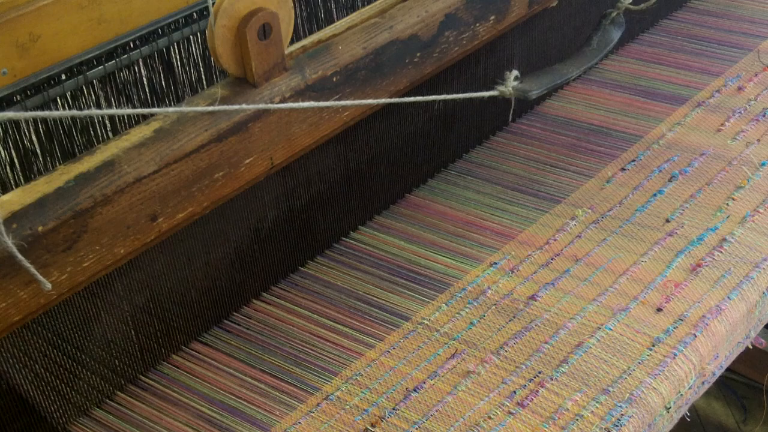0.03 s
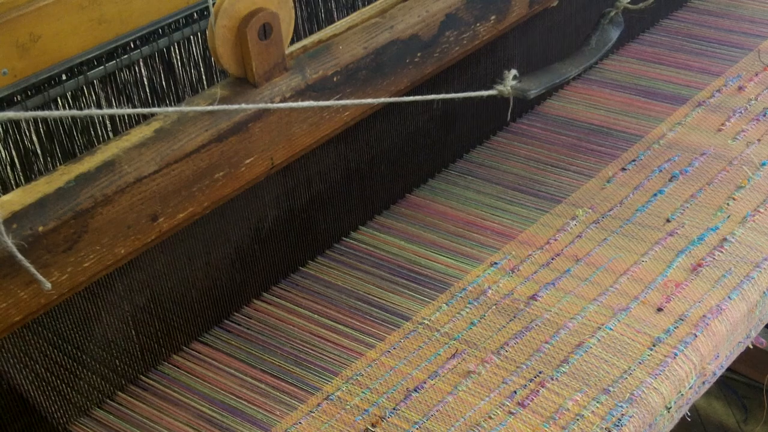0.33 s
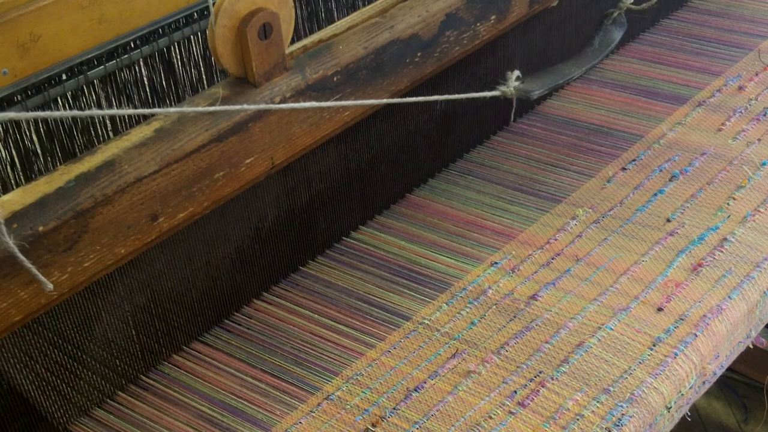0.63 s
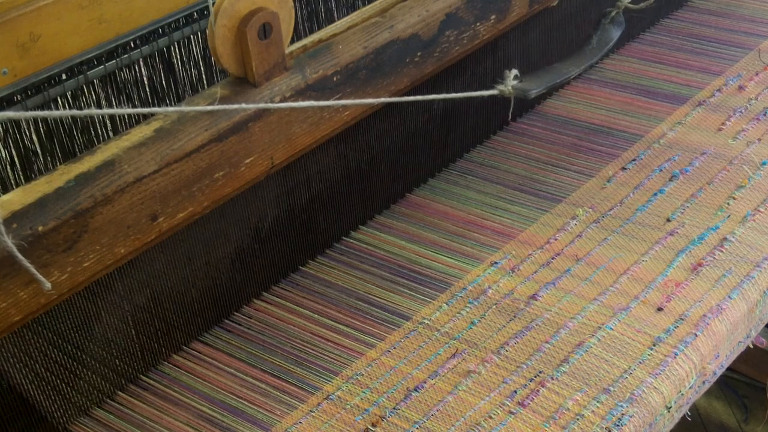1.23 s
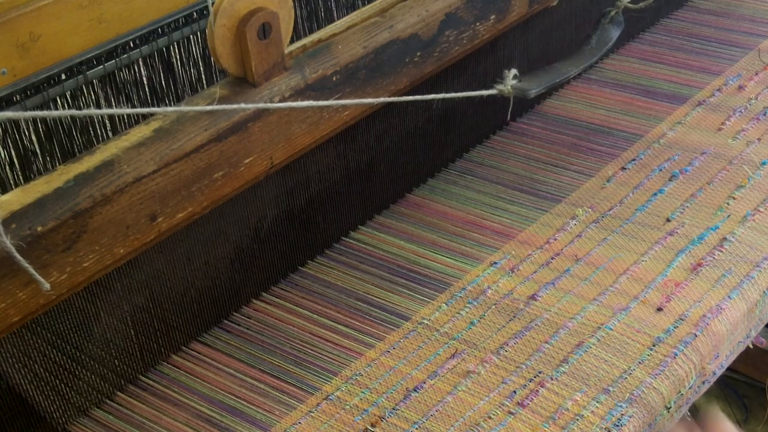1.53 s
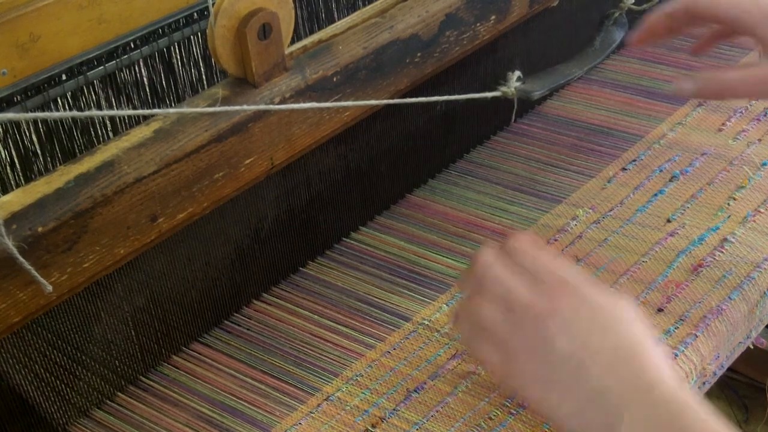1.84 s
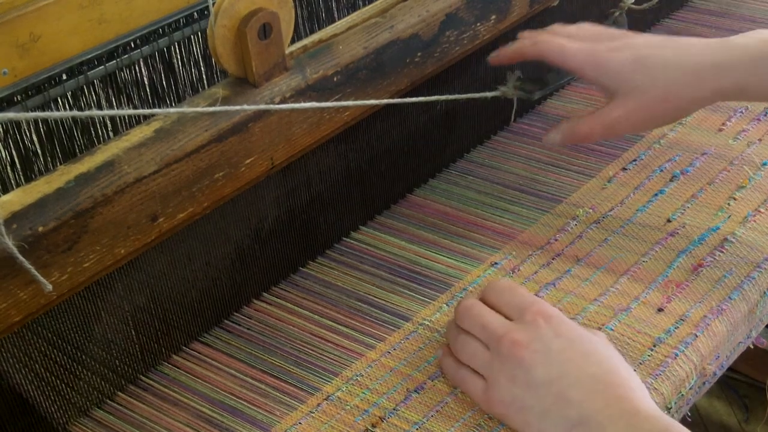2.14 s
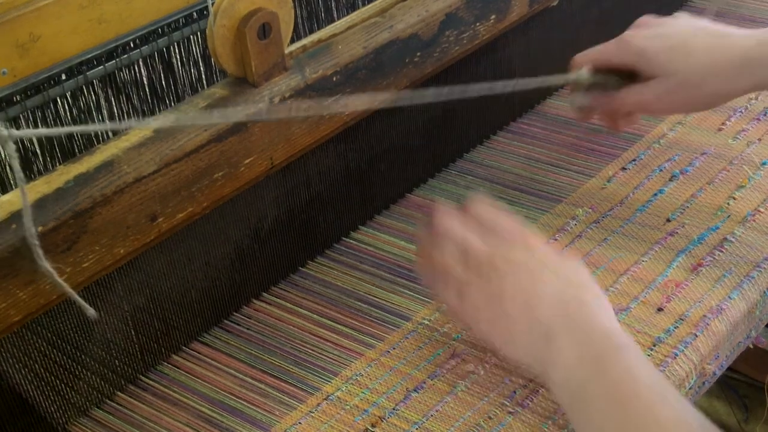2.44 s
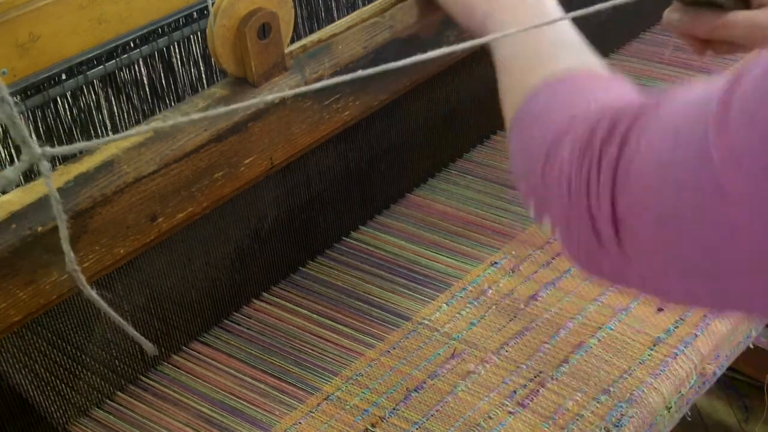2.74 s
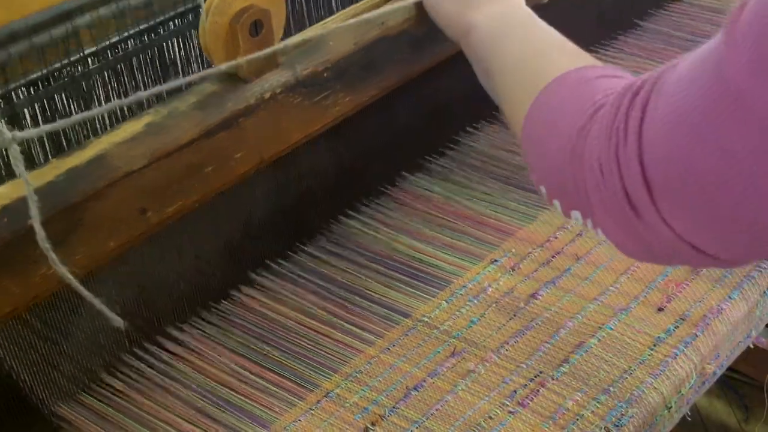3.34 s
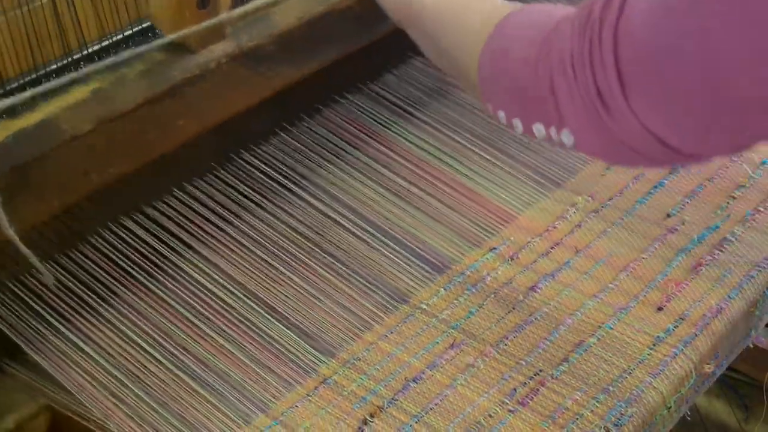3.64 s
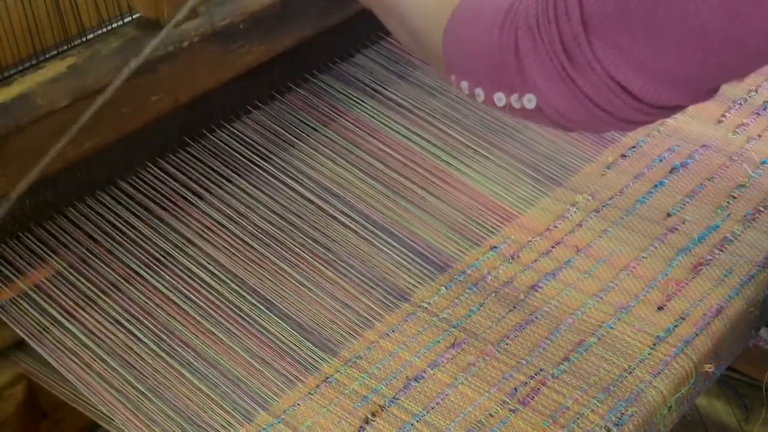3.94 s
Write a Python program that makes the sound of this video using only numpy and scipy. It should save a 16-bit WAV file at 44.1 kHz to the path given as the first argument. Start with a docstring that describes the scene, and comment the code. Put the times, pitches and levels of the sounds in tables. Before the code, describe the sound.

A wooden hand loom works close by in an echoing workshop. Scattered clicks and distant looms come first, then a run of wooden knocks, a scrape along the threads with a thin squeak, and a clacking rattle.

```python
"""In an echoing workshop, a wooden hand loom works close by while other looms clatter further off.
The weaver takes the cord handle with a few wooden knocks and pushes the beater (the swinging bar)
back. Its reed, a comb of wires, scrapes along the warp (the stretched threads) with a thin squeak.
Then the frame rumbles, the reed rings briefly, and the shafts that lift the threads clack and rattle
their loose heddles (the loops that hold the threads)."""
import sys
import numpy as np
from scipy import signal
from scipy.fft import rfft, irfft
from scipy.io import wavfile
from scipy.ndimage import uniform_filter1d

SR = 44100
rng = np.random.default_rng(int(sys.argv[2]) if len(sys.argv) > 2 else 0)


def wrap_up_sound(samples):
    """Save the sound to the file named by the first command line argument, as 16-bit audio."""
    columns = np.atleast_2d(samples).T
    # keep every value between -1 and 1, then stretch to whole-number steps
    tamed = np.clip(columns, -1, 1)
    steps = np.round(tamed * 32767).astype(np.int16)
    wavfile.write(sys.argv[1], SR, steps)


N = 176400

# tone of the quiet room: f/Hz, level/dB
AIR_COLOUR = [(25, -3.5), (50, 7.5), (100, -0.5), (250, 0), (600, -7), (2500, -14.5), (5000, -35),
              (14000, -16.5)]
# blows of the far looms, and the hall's echo of the near knocks at 3 s: t/s, level/dB, rise/s,
# t60/s (time to fade by 60 dB), first crack/dB, resonance f/Hz, resonance level/dB, kind of ring
HALL_SOUNDS = [(.225, -28.5, 0.0013, 1.13, 4, 162, -4, "ringing"),
               (.652, -44.5, 0.0092, 3.5, -15, 1480, -6, "dull"),
               (1.358, -34.5, 0.0038, 5.1, -25, 2600, -8, "dull"),
               (1.474, -23, 0.017, 1.57, 16, 1150, -12, "dull"),
               (1.545, -29, 0.005, 1.67, 0, 260, -5, "dull"), (1.665, -36, 0.0029, 0.79, 8, 990, 4, "dull"),
               (1.905, -28.5, 0.012, 1.4, 13.5, 2230, -1, "clanging"),
               (1.934, -28.5, 0.0044, 1.37, -10, 2740, -1, "clanging"),
               (2.06, -35, 0.0098, 1.01, -17, 851, -1, "clanging"),
               (2.67, -43, 0.029, 3.6, -2, 490, 2.5, "dull"),
               (2.795, -35.5, 0.013, 1.38, -12, 820, 0.5, "dull"),
               (2.98, -31, 0.013, 1.6, -10, 1360, -10, "dull"),
               (3.115, -26.5, 0.0091, 3.07, -9, 487, -12, "dull")]
# tone of their echoes: f/Hz, level/dB
FAR_COLOUR = [(40, 6), (90, 0), (200, -5), (400, -0.5), (1000, 4.5), (2800, 1.5), (4200, -2.5),
              (6300, -5.5), (10000, -17.5), (15000, -33)]
# pitches of each kind of distant ring: f/Hz, width/Hz, level/dB
FAR_MODES = {"ringing": [(610, 300, -6), (1390, 310, -5), (1790, 170, -9), (2415, 310, -5.5),
             (2900, 130, -9.5), (3253, 150, -6.5), (3490, 70, -13.5), (3890, 140, -9.5), (5330, 130, -12),
             (5870, 240, -11.5), (9300, 1500, -20)], "dull": [(1595, 190, -12.5), (2273, 200, -10),
             (2940, 460, -11), (4110, 140, -21), (9500, 2900, -19)], "clanging": [(1580, 25, -12.5),
             (2580, 62, -6.5), (2766, 72, -6), (4120, 290, -12)]}
# low shudders of the near frame, and a brief ring of the reed (last row):
# t/s, length/s, level/dB, f/Hz, width/Hz
SHUDDERS_AND_RING = [(2.311, 0.15, -38, 240, 440), (2.454, 0.2, -38.5, 230, 240),
                     (3.639, 0.13, -34.5, 135, 107), (3.676, 0.15, -36.5, 49, 16),
                     (3.826, 0.13, -33.5, 875, 220)]
# how loudly the heddles rattle: t/s, level/dB
RATTLE_LEVEL = [(3.65, -71), (3.72, -31.5), (3.80, -43), (3.86, -33), (3.95, -28.5), (4., -44)]
# tone of the rattle: f/Hz, level/dB
RATTLE_COLOUR = [(100, -3), (400, -0.5), (900, 0), (2000, 5.5), (3700, -4), (6000, -1), (14000, -14)]
# the threads' main squeak, brief lower chirp and higher squeal: t/s, f/Hz, level/dB
SQUEAK = [(3.361, 1477, -38), (3.41, 1562, -35), (3.49, 1588, -31), (3.565, 1614, -30.5),
          (3.615, 1590, -27), (3.646, 1520, -67)]
CHIRP = [(3.358, 1243, -39), (3.378, 1275, -30), (3.46, 1290, -39.5)]
SQUEAL = [(3.44, 5560, -46), (3.47, 5480, -33), (3.50, 5420, -33), (3.53, 4990, -35), (3.58, 5270, -33),
          (3.635, 5350, -46)]
# how hard the reed presses on the threads: t/s, level/dB
SCRAPE_PRESSURE = [(3.115, -74), (3.15, -24.5), (3.25, -26), (3.33, -26), (3.39, -24.5), (3.52, -25.5),
                   (3.635, -22.5), (3.655, -27), (3.70, -101)]
# tone of the scrape: f/Hz, level/dB
SCRAPE_COLOUR = [(50, 9), (200, -2), (500, 7), (900, 4), (1400, 9.5), (3200, 10), (5500, 9.5), (7500, 10),
                 (11000, 3.5), (15000, 0)]
# pitches at which the reed's wires ring: f/Hz, width/Hz, level/dB
WIRE_MODES = [(2270, 46, -16.5), (3100, 160, -21), (3490, 70, -17), (4440, 97, -17), (8970, 92, -14),
              (9750, 150, -15), (11070, 70, -9)]
# how strongly the wires ring within the scrape: t/s, level/dB
WIRE_LEVEL = [(3.05, -12), (3.3, -2.5), (3.39, 1), (3.71, -10)]
# wooden knocks and clicks close by: t/s, level/dB, brightness/Hz, chatter t60/s,
# ring f/Hz, ring level/dB, ring t60/s
KNOCKS = [(0.1246, -21.5, 900, 0.03, 655, 10, 0.03), (0.1256, -18, 4000, 0.034, 3580, 6, 0.0053),
          (0.131, -9, 6600, .025, 3240, 5, 0.0068), (.139, -11.5, 8000, 0.0017, 3620, 6.5, 0.0067),
          (0.153, -28, 5500, 0.02, 3240, 13, 0.0063), (0.9976, -7, 4900, 0.05, 2780, -14, 0.023),
          (1.0839, -2, 4560, 0.057, 2670, -14, 0.015), (1.6, 3, 750, .16, 303, -2.5, 0.036),
          (2.3603, -2.5, 1700, 0.055, 664, -1.5, 0.031), (2.4647, -1, 2000, 0.086, 332, 3, 0.019),
          (2.5137, -5.5, 3700, 0.025, 3500, -23, 0.012), (2.528, 0, 745, 0.021, 302, 0, 0.024),
          (2.5385, -1, 4200, 0.06, 3670, -1, 0.014), (2.5423, -6, 4400, 0.081, 1440, 4.5, 0.063),
          (2.601, -3, 4460, 0.091, 1550, -3, 0.031), (2.815, -7.5, 4300, 0.025, 1810, -1.5, 0.015),
          (2.9964, 2.5, 4080, 0.037, 1370, -4, 0.05), (3.0047, -5.5, 4900, 0.023, 3170, 4.5, 0.027),
          (3.0575, 8, 4170, 0.029, 3650, -6.5, 0.025), (3.094, -2, 4660, 0.12, 3660, -3, 0.03),
          (3.152, 8, 6000, 0.15, 480, -11, 0.037), (3.22, 2.5, 6050, 0.026, 3900, -15, .02),
          (3.461, 3.5, 7050, 0.018, 3420, -18, 0.018), (3.505, -3, 4060, 0.056, 2880, 3, 0.03),
          (3.6463, 3.5, 9480, 0.012, 2330, 9, 0.0043), (3.708, 2.5, 1920, 0.4, 1900, -6, 0.02),
          (3.7708, 7, 1510, 0.025, 785, -0.5, 0.018), (3.7722, 0, 2460, 0.0097, 1280, 13.5, 0.017),
          (3.797, -2, 3530, 0.033, 2404, -2, 0.028), (3.8, 12, 4000, 0.019, 930, 0, 0.033),
          (3.822, -10, 6000, 0.012, 4900, -1, .006), (3.927, 4.5, 6060, 0.047, 2044, -2, 0.029),
          (3.957, 5.5, 5600, 0.024, 3270, -8, 0.033), (3.963, -3.5, 5000, .03, 1820, 0, .025)]
# pitches at which the wooden frame rings: f/Hz, level/dB, t60/s
FRAME_MODES = [(595, -1, 0.027), (850, 9.5, 0.0093), (1210, 11, 0.0087), (1404, -7, 0.16), (1900, 3, 0.035),
               (2550, -13, 0.03), (2940, 7.5, 0.039), (3700, 11.5, 0.024), (4800, -56, 0.037)]
# tone of the microphone, with a deep dip in the treble: f/Hz, level/dB
MIC_COLOUR = [(30, -4.5), (4000, 2), (5200, -1.5), (6300, -4.5), (7200, -15.5), (7900, -32), (8500, -21.5),
              (9100, -11.5), (10800, -14), (12000, -20), (15500, -28)]


def undb(db):
    """Turn decibels into a number to multiply by."""
    return 10 ** (np.asarray(db) / 20)


def level(x, db):
    """Scale a sound to an average (rms) level."""
    return x * undb(db) / np.sqrt(np.mean(x ** 2))


def unit(x):
    """Scale a sound to a total energy of one."""
    return x / np.sqrt(np.sum(x ** 2))


def noise(n=N):
    """Plain white noise, n samples long."""
    return rng.standard_normal(n)


def fade(t, t60):
    """Die away by 60 dB every t60 seconds."""
    return np.exp(-np.log(1000) * t / t60)


def add(out, start_s, x):
    """Mix a sound in at a given time."""
    i = int(start_s * SR)
    out[i:i + len(x)] += x[:N - i]


def curve(points):
    """A loudness curve through (t/s, level/dB) points, silent outside them."""
    times, db = np.array(points).T
    return undb(np.interp(np.arange(N) / SR, times, db, left=-200, right=-200))


def colour(x, points):
    """Shape the tone through (f/Hz, level/dB) points."""
    hz, db = np.array(points).T
    n = 2 * N
    log_hz = np.log(np.arange(N + 1) * SR / n + 1)
    gain = undb(np.interp(log_hz, np.log(hz), db))
    cepstrum = irfft(np.log(gain))
    cepstrum[1:N] *= 2  # folded so the filter rings only after a sound, never before
    cepstrum[N + 1:] = 0
    return irfft(rfft(x, n) * np.exp(rfft(cepstrum)))[:len(x)]


def band(x, hz, width):
    """One resonance: keep what lies near a pitch."""
    return signal.lfilter(*signal.iirpeak(hz, hz / width, fs=SR), x)


def steep_band(x, hz, width):
    """The same resonance twice, for steeper sides."""
    return band(band(x, hz, width), hz, width)


def cut(x, hz, keep, order=2):
    """Keep the "low" or the "high" side of a frequency."""
    return signal.sosfilt(signal.butter(order, hz, keep, fs=SR, output="sos"), x)


def wobble(samples):
    """A random drift, slower when smoothed over more samples."""
    return level(uniform_filter1d(noise(), size=samples), 0)


def clicks(per_s, scatter=0.38):
    """Tiny contacts at random times and of uneven size."""
    return (rng.random(N) < per_s / SR) * np.sign(noise()) * np.exp(scatter * noise())


def hall_decay(x, t60, damping_hz=6900):
    """Let a sound die away octave by octave, the treble sooner."""
    t, out, below = np.arange(N) / SR, 0, 0
    spectrum, f = rfft(x), np.arange(N // 2 + 1) * SR / N
    for hz in 500 * 2 ** np.arange(6):
        lows = irfft(spectrum / (1 + (f / hz / np.sqrt(2)) ** 4))
        out += (lows - below) * fade(t, t60 / np.hypot(1, hz / damping_hz))
        below = lows
    return out


def room_air():
    """The steady low hush of the room."""
    return level(colour(noise(), AIR_COLOUR), db=-44.5)


def far_looms_and_echo():
    """Far looms' blows, and one echo of the near knocks, arrive as a metallic crack and a long wash."""
    t, out = np.arange(N) / SR, np.zeros(N)
    for start_s, db, rise_s, t60, crack_db, resonance_hz, resonance_db, kind in HALL_SOUNDS:
        grain = np.exp(0.055 * wobble(60))
        echoes = level(colour(noise() * grain, FAR_COLOUR), db=1)
        push = noise() * grain
        ring = sum(level(steep_band(push, hz, width), mode_db) for hz, width, mode_db in FAR_MODES[kind])
        crack = 1 + undb(crack_db) * fade(t, t60=0.054)
        resonance = steep_band(noise(), resonance_hz, width=0.48 * resonance_hz + 150)
        wash = echoes + ring * crack + level(resonance, resonance_db)
        swell = 1 - np.exp(-(t / rise_s) ** 2)
        add(out, start_s, undb(db) * hall_decay(wash, t60) * swell)
    return out


def sizzle(start_s=1.1, length_s=.2):
    """A faint, thin hiss swells and fades."""
    out, n = np.zeros(N), int(length_s * SR)
    hiss = band(noise(n), hz=10500, width=1050) * signal.windows.tukey(n, .5)
    add(out, start_s, level(hiss, db=-51))
    return out


def shudders_and_ring():
    """Moving parts judder: low shudders of the frame and a brief ring of the reed swell and fade."""
    out = np.zeros(N)
    for start_s, length_s, db, hz, width in SHUDDERS_AND_RING:
        n = int(length_s * SR)
        resonance = steep_band(noise(), hz, width)[-n:]
        add(out, start_s, level(resonance * signal.windows.tukey(n, .5), db))
    return out


def heddles():
    """Loose heddles jostle as the shafts change, each touch a tiny tick."""
    t = np.arange(N // 50) / SR
    touches = clicks(per_s=770, scatter=.55)
    tick = noise(len(t)) * fade(t, t60=0.0091)
    rattle = signal.fftconvolve(touches, tick)[:N]
    return level(colour(rattle, RATTLE_COLOUR), 0) * curve(RATTLE_LEVEL)


def squeak(track, jitter, rough, octave_db):
    """Slipping threads lock into a thin tone, unsteady in pitch (jitter) and strength (rough)."""
    times, hz, db = np.array(track).T
    pitch = np.interp(np.arange(N) / SR, times, hz) * (1 + jitter * wobble(200))
    phase = 2 * np.pi * np.cumsum(pitch) / SR
    tone = np.sin(phase) + undb(octave_db) * np.sin(2 * phase)
    grip = 1 + rough * wobble(200)
    return level(tone * grip, 0) * curve(np.c_[times, db])


def patches(depth_db=5, patch_s=0.06):
    """A flutter in loudness that makes wires and grit sound in patches."""
    return undb(depth_db * level(cut(noise(), 1 / patch_s, "low"), 0))


def reed_scrape(slips_per_s=6900):
    """Threads catch and slip in the reed and ring its wires; fibres snapping past add grit."""
    slips = level(colour(clicks(slips_per_s), SCRAPE_COLOUR), 0)
    wires = sum(level(band(clicks(slips_per_s) * patches(), hz, width), db)
                for hz, width, db in WIRE_MODES)
    fibres = cut(clicks(per_s=500), 12000, "high", order=1)
    grit = level(fibres * patches(), db=-5)
    return (slips + wires * curve(WIRE_LEVEL) + grit) * curve(SCRAPE_PRESSURE)


def frame_ring(t, detune=0.0174):
    """The struck wooden frame rings at several pitches, a little different each time."""
    out = np.zeros(len(t))
    for hz, db, t60 in FRAME_MODES:
        pitch = hz * (1 + detune * rng.standard_normal())
        out += undb(db) * rng.choice([-1, 1]) * np.sin(2 * np.pi * pitch * t) * fade(t, t60)
    return out


def knocks(frame_db=-8.5, room_db=-11, chatter_drive=0.38, tick_hz=8500):
    """Each blow chatters briefly, rings the struck part and the frame, and echoes in the room."""
    t, direct, to_room = np.arange(N // 16) / SR, np.zeros(N), np.zeros(N)
    for start_s, db, bright_hz, chatter_t60, ring_hz, ring_db, ring_t60 in KNOCKS:
        chatter = unit(noise(len(t)) * fade(t, chatter_t60))
        crack = cut(chatter, bright_hz, "low")
        crack = unit(cut(crack, .36 * ring_hz, "high"))  # small parts give no bass
        frame = unit(cut(frame_ring(t), bright_hz, "low"))
        blow = crack + undb(frame_db) * frame
        ring = np.sin(2 * np.pi * ring_hz * t) * fade(t, ring_t60)
        ring += chatter_drive * signal.fftconvolve(chatter, ring)[:len(t)]
        ring = undb(ring_db) * unit(cut(ring, 2 * ring_hz, "low"))
        tick = noise(len(t)) * fade(t, t60=0.0079)  # the crisp first instant of contact
        tick = undb(-10) * unit(cut(tick, tick_hz, "high", order=1)) * bright_hz / tick_hz
        add(direct, start_s, undb(db) * (blow + ring + tick))
        add(to_room, start_s, undb(db) * blow)
    room = unit(hall_decay(noise(), t60=1))
    return direct + undb(room_db) * signal.fftconvolve(to_room, room)[:N]


def scene():
    """The quiet room, the far looms and the near loom, in one channel."""
    air = room_air()
    squeaks = squeak(SQUEAK, jitter=0.005, rough=0.26, octave_db=-5)
    squeaks += squeak(CHIRP, jitter=0.0054, rough=0.16, octave_db=-10)
    squeaks += squeak(SQUEAL, jitter=.012, rough=1.5, octave_db=-12)
    return (air + far_looms_and_echo() + knocks() + reed_scrape() + squeaks
            + shudders_and_ring() + heddles() + sizzle())[None]


def record(dry, overload=.65, start_s=.105, top_hz=15200):
    """A small microphone, on just after the start, rounds off peaks, dips the treble and hisses."""
    hiss = level(noise(), db=-63.5)
    hiss -= band(hiss, hz=8020, width=2400)
    rounded = overload * np.tanh(dry[0] / overload)
    x = colour(rounded, MIC_COLOUR) + hiss
    x *= np.arange(N) / SR > start_s
    return signal.sosfilt(signal.ellip(8, .2, 70, top_hz, fs=SR, output="sos"), x)[None]


dry = scene()
out = record(dry)
wrap_up_sound(out)
```